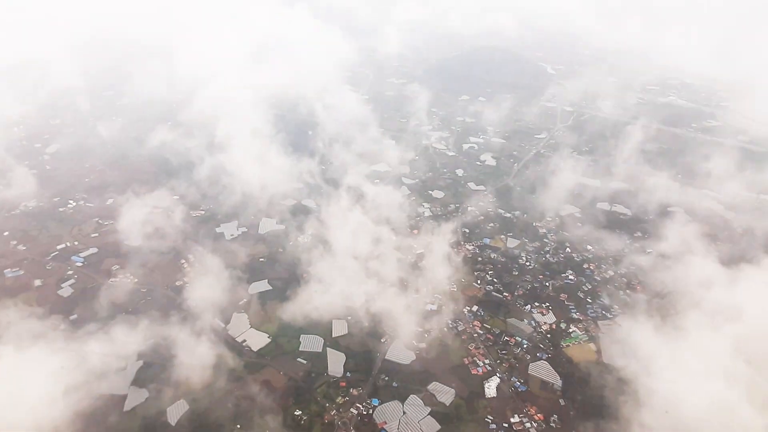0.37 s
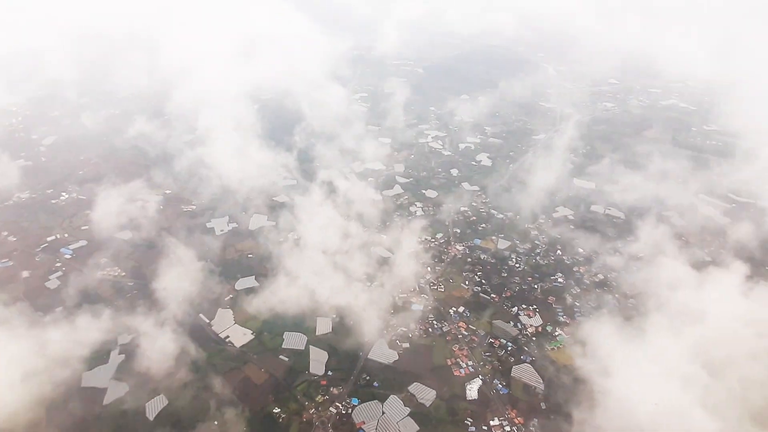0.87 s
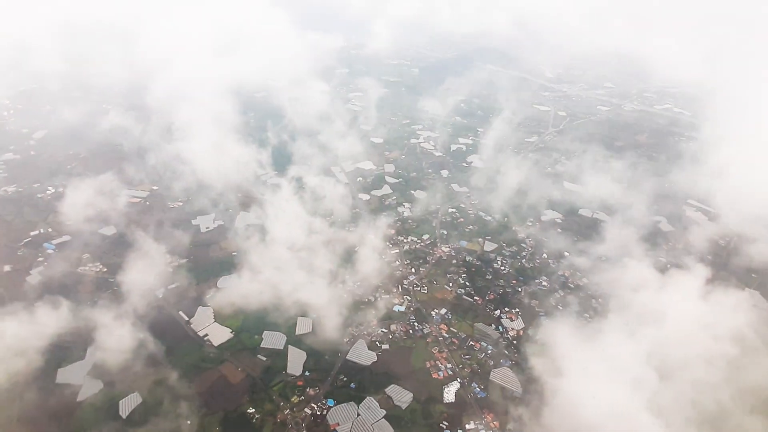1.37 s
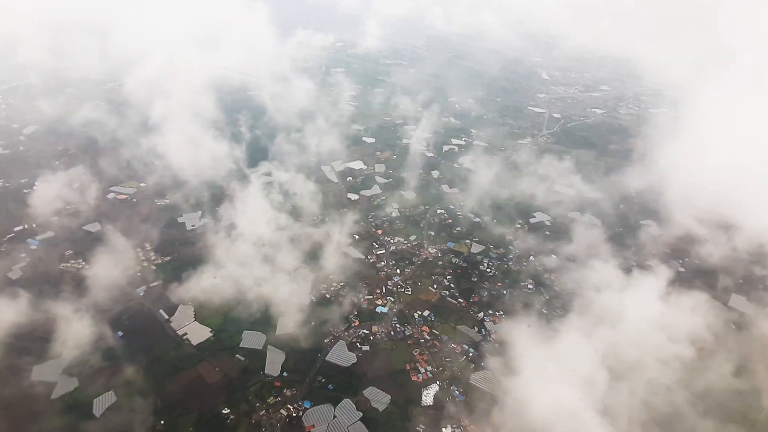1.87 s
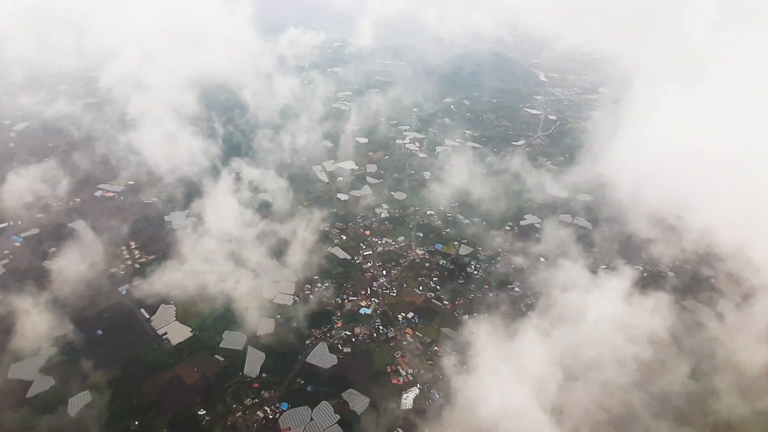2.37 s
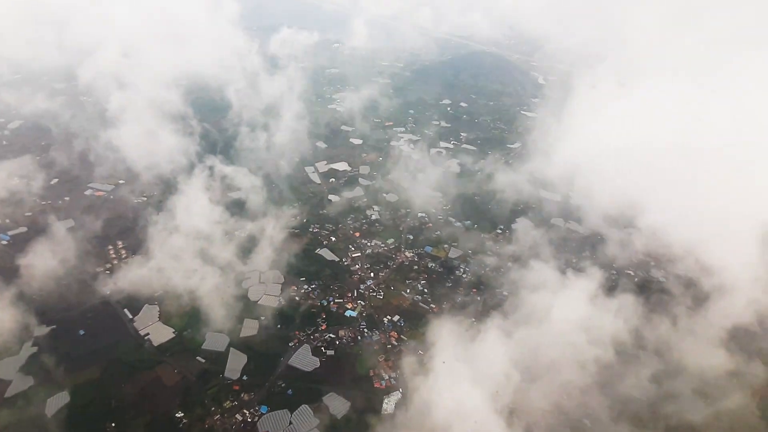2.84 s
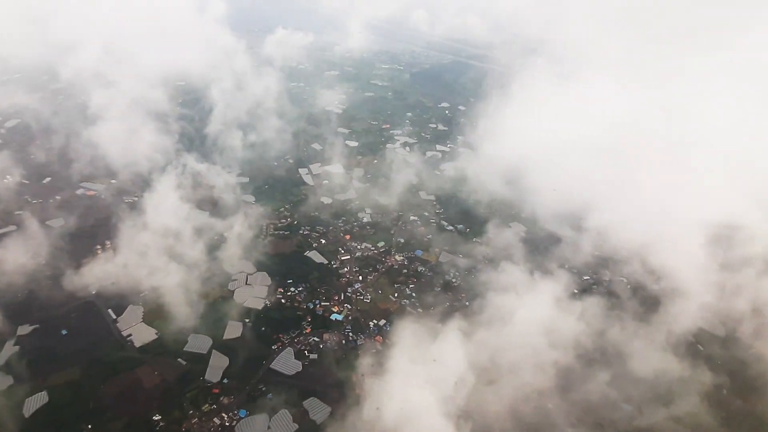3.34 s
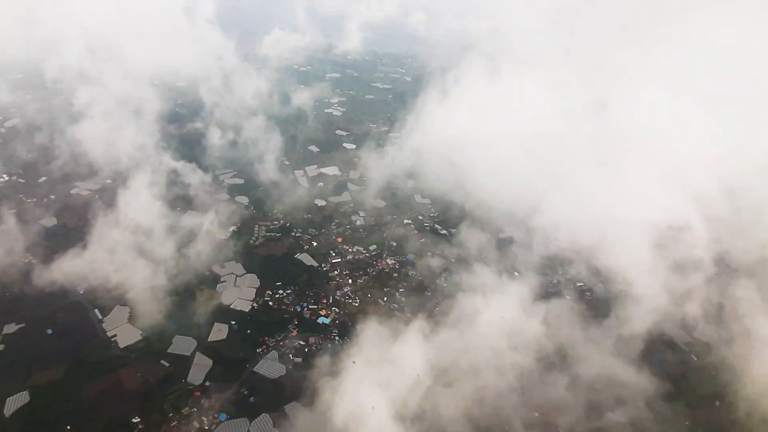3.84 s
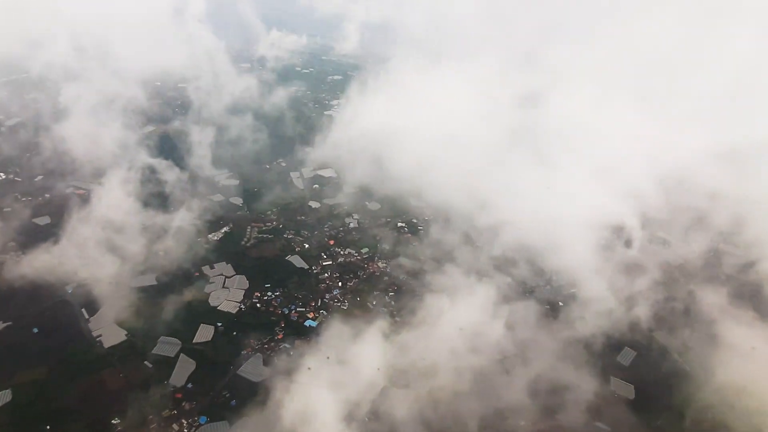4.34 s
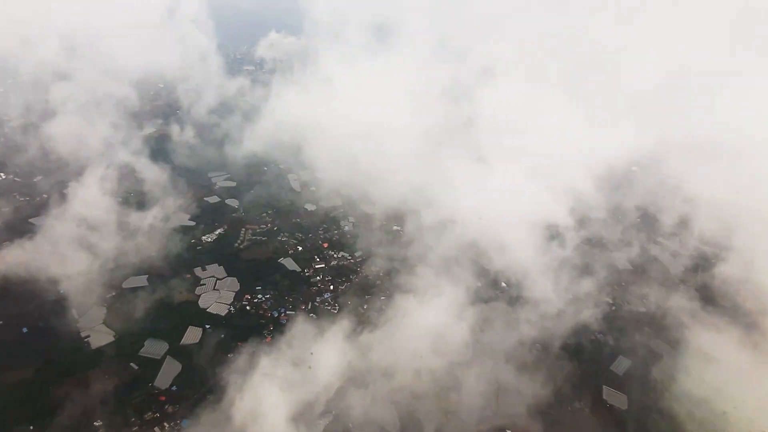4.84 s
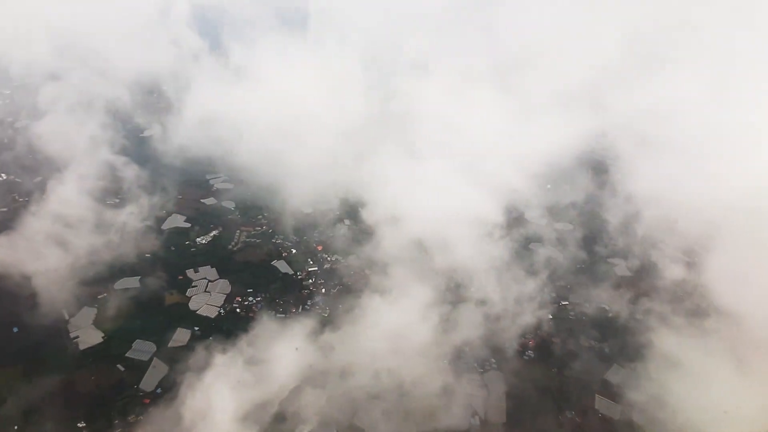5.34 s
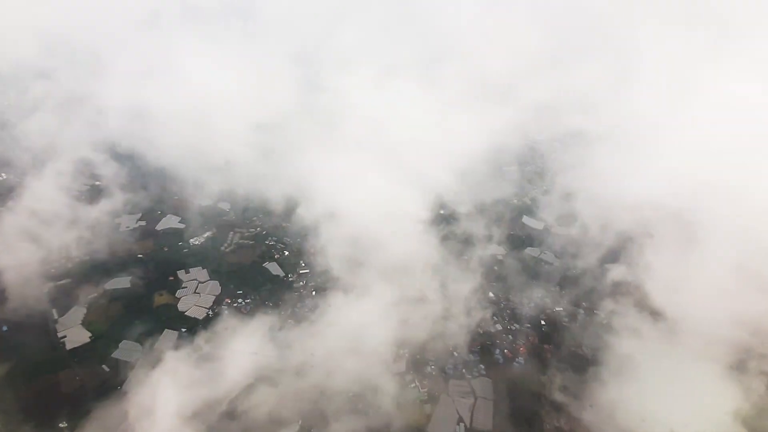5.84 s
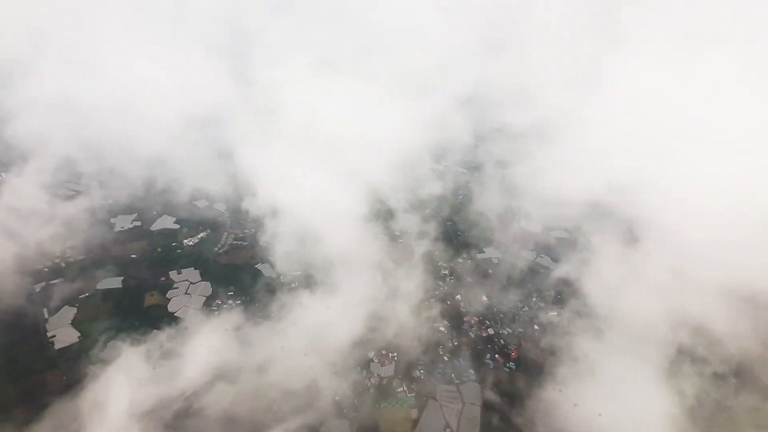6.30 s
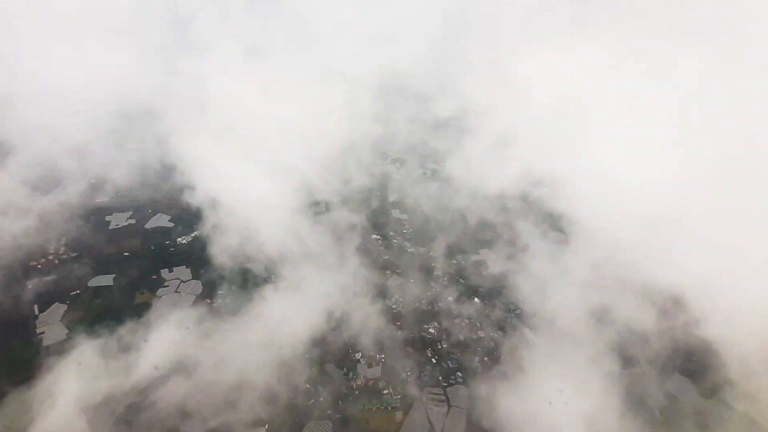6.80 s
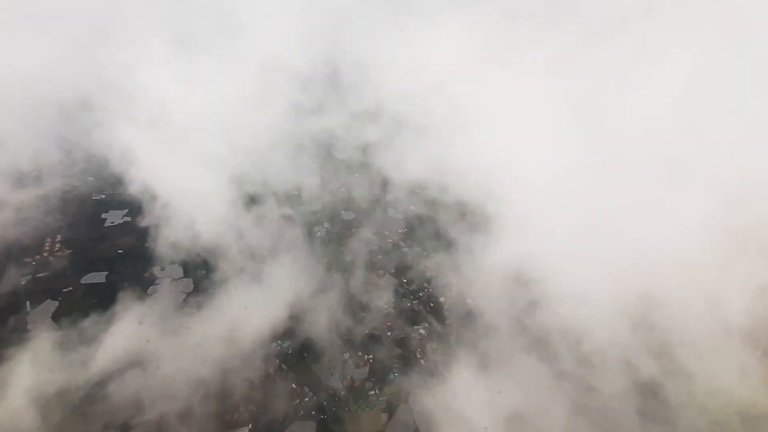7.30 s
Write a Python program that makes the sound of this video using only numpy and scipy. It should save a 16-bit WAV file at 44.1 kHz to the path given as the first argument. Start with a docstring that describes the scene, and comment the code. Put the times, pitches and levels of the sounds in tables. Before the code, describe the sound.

Deep, steady airliner cabin rumble with soft air hiss and faint, slowly rising turbine whine, plus a few small plastic ticks near the microphone.

```python
"""Airliner cabin in flight: a deep rumble through the fuselage, air hiss, and thin turbine whines.
Rumble and hiss are shaped random spectra; the whines are sines at sums of fan and core shaft rates
that climb as the shafts speed up. Near the microphone, cloth brushes (band-passed noise) and plastic
ticks (smeared cracks, scatter, hollow knocks). A gain control holds the rumble down."""
import sys
import numpy as np
from scipy import signal
from scipy.fft import rfft, irfft
from scipy.io import wavfile
from scipy.ndimage import uniform_filter1d

SR = 44100
rng = np.random.default_rng(int(sys.argv[2]) if len(sys.argv) > 2 else 0)


def transcribe(u):
    """Save the signal u as a 16-bit wav file named by the first command-line argument.

    u: samples, shape (n,) or (channels, n), limited to [-1, 1]; the rate is SR.
    q: integer samples, one column per channel.
    """
    v = np.clip(np.atleast_2d(u).T, -1, 1)
    q = np.round(v * 32767).astype(np.int16)
    wavfile.write(sys.argv[1], SR, q)


def volts_from_db(level):
    """Convert decibel levels to linear amplitude ratios."""
    exponent = np.asarray(level, float) / 20
    return 10 ** exponent


N = 327663

# shaft speeds: t/s, step of the fan-shaft tones f/Hz, core-shaft tone f/Hz
SHAFTS = [(0.0, 69.7, 7462), (0.6, 69.65, 7465), (1.0, 70.4, 7504), (1.5, 72.95, 7594), (2.0, 75.7, 7615),
          (2.5, 76.8, 7611), (3.1, 77.3, 7590), (4.0, 78.5, 7630), (5.0, 81.65, 7686), (6.0, 84.25, 7740),
          (6.5, 85.35, 7765), (7.0, 85.95, 7760), (7.43, 86.7, 7792)]


def read(points, hz):
    """Interpolates a table on a log-frequency axis."""
    f, value = np.transpose(points)
    return np.interp(np.log(hz + 1), np.log(f + 1), value)


def evened(x):
    """Scales to rms 1."""
    return x / np.sqrt(np.mean(x ** 2) + 1e-20)


def sides(pan_db):
    """Left and right gains for a left-minus-right level."""
    return volts_from_db(np.array([[.5], [-.5]]) * pan_db)


def drift(shape, *sizes):
    """Smoothed noise of rms 1, one smoothing length per axis."""
    x = rng.standard_normal(shape)
    for axis, size in enumerate(sizes):
        x = uniform_filter1d(x, size, axis)
        x = uniform_filter1d(x, size, axis)
    return evened(x)


def airflow(spectrum, level_db, size, patchy_db, flicker_db, thrust_db_per_hz):
    """Turbulence noise: random short-time spectra, partly shared by both microphones, patchy and flickering."""
    # cabin, panel and vent resonances: f/Hz, width/Hz, lift/dB
    resonances = [(56, 14, 7), (110, 22, 3), (200, 10, 3), (266, 20, 2), (312, 25, 2), (955, 25, 3),
                  (1470, 60, 3), (2003, 40, 7), (2178, 65, 5), (5150, 150, 3), (7750, 50, 4),
                  (8450, 400, 3), (10245, 25, 4), (10440, 18, 6), (10542, 22, 5), (10835, 40, 6)]
    # buffets that swell the deepest rumble: middle t/s, length/s, lift/dB
    buffets = [(.55, 0.63, 3.5), (1.9, .5, 5), (4.3, 0.5, 4.5)]
    # left-right likeness: f/Hz, correlation/1
    likeness = [(40, 0.8), (60, 0.97), (160, 0.99), (270, .93), (450, 0.7), (740, -0.22), (1220, -0.23),
                (2000, -0.027), (15000, -0.032)]
    # balance: f/Hz, left minus right/dB
    balance = [(60, -1.5), (120, -1), (240, -1.5), (480, -0.5), (950, -10), (1890, -1.5), (3770, -3.5),
               (7520, -1.0), (15000, -3.5)]
    edge_hz, buffet_hz = 15830, 75  # upper ends of the noise and of the buffets
    lag_s, lag_top_hz = 0.00015, 500  # left hears the shared part later; phase lag constant above the top

    hop = size // 4
    frames, hz = N // hop + 9, np.fft.rfftfreq(size, 1 / SR)
    shape_db = read(spectrum, hz)
    for f, width_hz, lift_db in resonances:
        shape_db = shape_db + lift_db / (1 + (2 * (hz - f) / width_hz) ** 2)
    shape_db[hz > edge_hz] = -200

    t = (np.arange(frames) * hop - size) / SR
    buffet_db = sum(db * np.exp(-(2 * (t - s) / length_s) ** 2) for s, length_s, db in buffets)
    fan_step_hz = np.interp(t, *np.transpose(SHAFTS)[:2])
    slow_db = np.outer(1 / (1 + (hz / buffet_hz) ** 6), buffet_db) + thrust_db_per_hz * fan_step_hz
    patches_db = patchy_db * drift((frames, len(hz)), 3, 9).T
    field_db = patches_db + flicker_db * drift(frames, 2) + slow_db

    a, b, c, d = rng.standard_normal((frames, len(hz), 4)).T
    right, apart = a + 1j * b, c + 1j * d
    same = np.clip(read(likeness, hz), -1, 1)[:, None]
    late = np.exp(-2j * np.pi * np.minimum(hz, lag_top_hz) * lag_s)[:, None]
    left = same * late * right + np.sqrt(1 - same ** 2) * apart
    z = np.array([left, right])
    z *= volts_from_db(shape_db[:, None] + field_db) * sides(read(balance, hz))[..., None]
    x = signal.istft(z, nperseg=size, noverlap=size - hop)[1][:, size:size + N]
    return volts_from_db(level_db) * x / np.sqrt(np.mean(x.mean(0) ** 2))


def turbines():
    """Blade rows on two shafts sound at sums of their rates; tones waver and swell through the wall modes."""
    # blade tones, each carried by the duct only between two fan speeds:
    # fan steps/1, core tones/1, level before lift/dB, from step f/Hz, to step f/Hz
    tones = [(61, 0, -70, 83.2, 99), (62, 0, -70, 74.3, 77.4), (66, 0, -74, 76, 99), (74, 0, -65, 0, 99),
             (78, 0, -72, 75, 83.5), (86, 0, -70, 79.8, 99), (90, 0, -67, 85, 99), (98, 0, -74, 80.6, 99),
             (99, 0, -71, 70, 73), (111, 0, -69, 0, 70.9), (123, 0, -64, 0, 71.5), (0, 1, -65, 0, 99),
             (12, 1, -68, 0, 76)]
    # wall modes that let a tone through as it climbs past: f/Hz, width/Hz, level/dB
    wall_modes = [(4700, 200, 0), (5145, 110, -1), (5345, 120, 3), (5550, 110, -3), (5760, 200, 0),
                  (6050, 180, -4), (6200, 50, -4), (6325, 100, 0), (7040, 260, 0), (7400, 120, -2),
                  (7530, 150, 1), (7755, 90, 1), (7980, 70, 9), (8310, 110, -3), (8480, 70, 4),
                  (8690, 220, -1)]
    leak_db = -19  # passes between the modes
    duct_fade_hz, waver_db, wobble, lift_db = 0.21, 2.8, 0.0007, 2  # wobble: rms fraction of shaft speed
    pan_hz, pan_db_per_octave = 6500, 5  # low tones lean right, high ones left

    t, grid = np.arange(N) / SR, np.arange(0, 8, .02)
    s, fan_hz, core_hz = np.transpose(SHAFTS)

    def smoothed(shaft_hz):
        """Shaft speed on the coarse grid, corners rounded."""
        return uniform_filter1d(np.interp(grid, s, shaft_hz), 12, mode="nearest")

    def shaft_turns(shaft_hz):
        """Running phase in turns, with speed wobble."""
        return np.cumsum(np.interp(t, grid, shaft_hz) * (1 + wobble * drift(N, 800))) / SR

    fan_hz, core_hz = smoothed(fan_hz), smoothed(core_hz)
    fan, core = shaft_turns(fan_hz), shaft_turns(core_hz)
    quarter_turn = np.array([[0], [1 / 4]])  # between the two microphones
    out = np.zeros((2, N))
    for steps, cores, db, low_hz, high_hz in tones:
        hz = steps * fan_hz + cores * core_hz
        wall = volts_from_db(leak_db)
        for f, width_hz, mode_db in wall_modes:
            wall = wall + volts_from_db(mode_db) / (1 + (2 * (hz - f) / width_hz) ** 4)
        duct = np.clip(np.minimum(fan_hz - low_hz, high_hz - fan_hz) / duct_fade_hz, 0, 1)
        level = volts_from_db(db + lift_db + waver_db * drift((2, len(grid)), 1, 4))
        gain = level * wall * duct * sides(pan_db_per_octave * np.log2(hz / pan_hz))
        turns = steps * fan + cores * core + rng.random() + quarter_turn
        out += np.array([np.interp(t, grid, g) for g in gain]) * np.sin(2 * np.pi * turns)
    return out


def cloth():
    """Cloth sliding near the microphone: bright, grainy band-passed noise bursts."""
    # strokes: t/s, length/s, lowest f/Hz, highest f/Hz, rms level before taper and pan/dB
    strokes = [(.79, .04, 11000, 15800, -58), (1.9, 0.34, 8500, 15800, -59.5),
               (2.17, .04, 6000, 15800, -63), (3.05, .04, 4000, 13000, -61),
               (5.063, 0.018, 4000, 4500, -50), (5.07, .04, 4200, 5100, -54),
               (5.063, .055, 4300, 15000, -60)]
    pan_db, grain_db = -3, 2.2
    out = np.zeros((2, N))
    for s, length_s, low_hz, high_hz, db in strokes:
        size = round(length_s * SR)
        grain = rng.standard_normal((2, size)) * volts_from_db(grain_db * drift(size, 150))
        band = signal.butter(2, [low_hz, high_hz], "band", fs=SR, output="sos")
        bright = evened(signal.sosfilt(band, grain))
        stroke = volts_from_db(db) * sides(pan_db) * bright * signal.windows.tukey(size, .7)
        out[:, round(s * SR):][:, :size] += stroke
    return out


def ticks():
    """Plastic ticks: a dry, even crack, then scatter off the window pane; each also bumps the hollow panel."""
    # ticks: t/s, level before lift/dB, brightness/(dB per octave), knock level/dB, left minus right/dB
    events = [(0.6873, -35, 9, -31, -6), (0.7072, -32, -3, -26, -8), (0.7880, -32.5, -6.5, -35, -16),
              (1.2862, -19, -1.5, -42, -6), (1.5229, -29.5, -2, -44, -7), (2.1854, -37, -6, -38, -4.0)]
    # colour of the crack: f/Hz, level/dB
    snap = [(500, -33), (1500, -3.5), (2500, -3.5), (4000, 1.5), (5500, 1), (6400, -3), (7300, 1.5),
            (9500, -7.5), (16000, -18)]
    lift_db, tilt_pivot_hz, smear_s = 2.5, 5000, 0.000399
    echo_s, tail_db, tail_s = .0026, -13, 0.0014  # pane echo; tail relative to the crack's peak
    knock_hz, knock_rise_s = 880, .0013

    size = 2048
    t, hz = np.arange(size) / SR, np.fft.rfftfreq(size, 1 / SR)
    out = np.zeros((2, N + size))
    # scatter builds four times faster than it dies
    scatter = volts_from_db(tail_db) * np.exp(-abs(t - echo_s) / np.where(t < echo_s, tail_s / 4, tail_s))
    bump = t / knock_rise_s * np.exp(1 - t / knock_rise_s) * np.sin(2 * np.pi * knock_hz * t)
    for s, peak_db, tilt_db, knock_db, pan_db in events:
        colour = volts_from_db(read(snap, hz) + tilt_db * np.log2((hz + 1) / tilt_pivot_hz))
        delay_s = smear_s * (2 + drift((2, len(hz)), 1, 25))  # each band arrives a little early or late
        phase = 2 * np.pi * np.cumsum(delay_s, axis=1) * hz[1]
        crack = irfft(colour * np.exp(-1j * phase)) * (t < 2 * echo_s)
        crack = crack / abs(crack).max()
        tail = scatter * evened(irfft(rfft(rng.standard_normal((2, size))) * colour))
        tick = volts_from_db(peak_db + lift_db) * (crack + tail) + volts_from_db(knock_db) * bump
        out[:, round(s * SR):][:, :size] += sides(pan_db) * tick
    return out[:, :N]


def scene():
    """Rumble, hiss, whines and the small sounds near the microphone."""
    # jet and airflow rumble through the wall: f/Hz, relative density/(dB per Hz)
    rumble_spectrum = [(24, -32), (40, -9.5), (59, -2), (81, -6.5), (113, -0.5), (151, -4), (309, -7.5),
                       (507, -22), (676, -27.5), (790, -42.5), (900, -48.5), (1170, -59), (1980, -120)]
    # air hiss above it: f/Hz, relative density/(dB per Hz)
    hiss_spectrum = [(410, -16.5), (700, -3), (798, -7.5), (1460, -8.5), (1800, -15), (2020, -15),
                     (2960, -19), (3890, -20.5), (5610, -30), (7890, -29), (9110, -35.5), (11100, -34.5),
                     (16000, -40)]
    rumble = airflow(rumble_spectrum, level_db=-16.5, size=4096, patchy_db=.5, flicker_db=0.08,
                     thrust_db_per_hz=0)
    # hiss grows with fan speed
    hiss = airflow(hiss_spectrum, level_db=-43, size=2048, patchy_db=0.63, flicker_db=0.27,
                   thrust_db_per_hz=0.0447)
    return rumble + hiss + turbines() + cloth() + ticks()


def top_cut(x):
    """Nothing passes above the cut-off."""
    return signal.sosfilt(signal.butter(12, 16850, fs=SR, output="sos"), x)


def record(dry):
    """The microphone cuts the deepest bass; gain control leans on the loudest peaks."""
    threshold_db, slope = -17, 0.37  # slope: dB of cut per dB over
    cut = signal.sosfilt(signal.butter(3, 42, "high", fs=SR, output="sos"), dry)
    power = uniform_filter1d((cut ** 2).mean(0), 900)
    power_db = 10 * np.log10(abs(power) + 1e-12)
    held = cut / volts_from_db(slope * np.maximum(power_db - threshold_db, 0))
    return top_cut(held)


dry = scene()
out = record(dry)
transcribe(out)
```